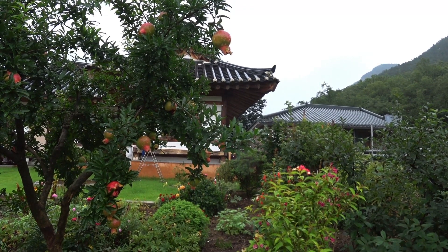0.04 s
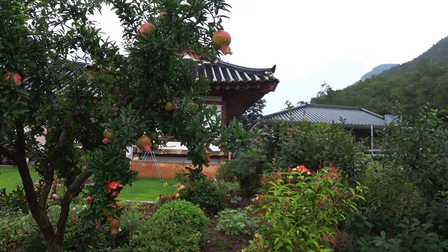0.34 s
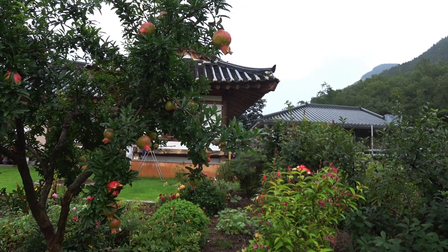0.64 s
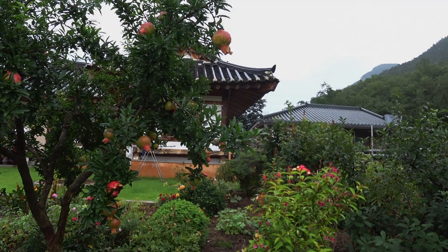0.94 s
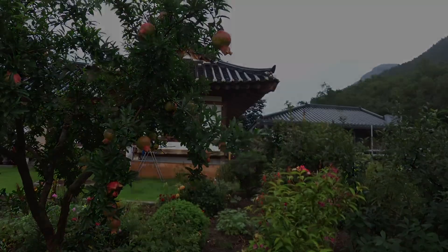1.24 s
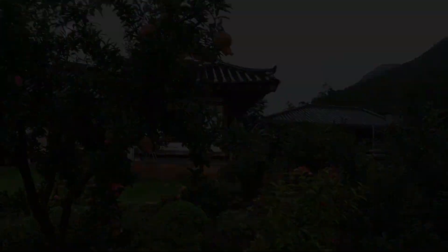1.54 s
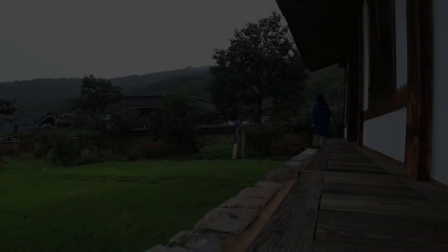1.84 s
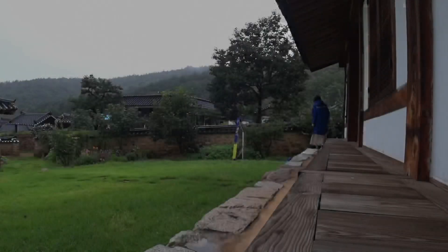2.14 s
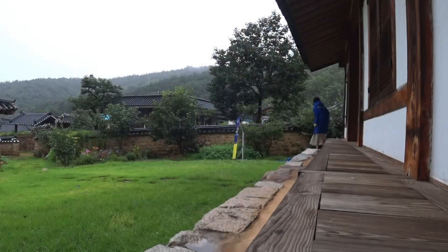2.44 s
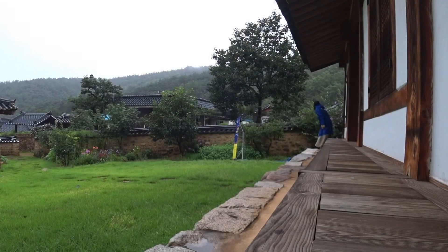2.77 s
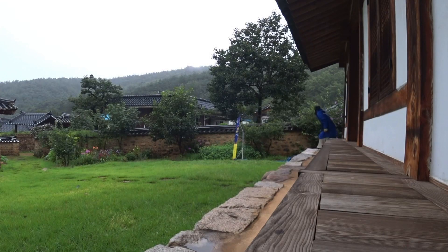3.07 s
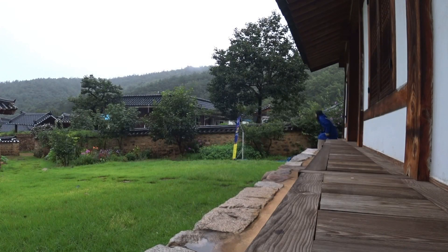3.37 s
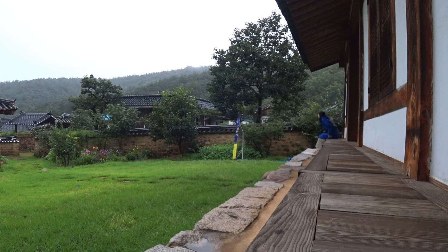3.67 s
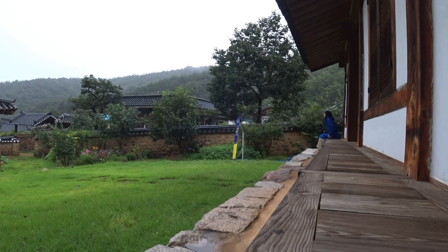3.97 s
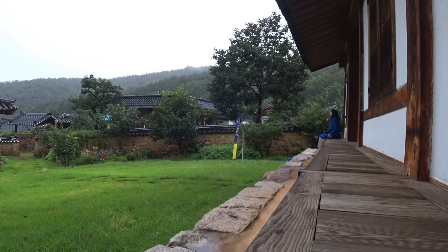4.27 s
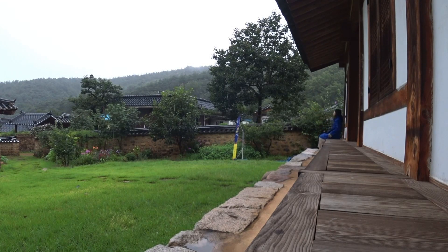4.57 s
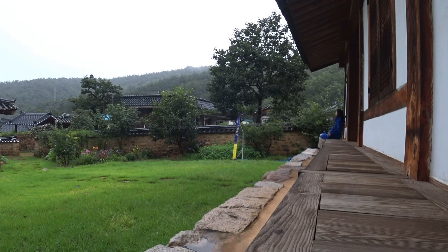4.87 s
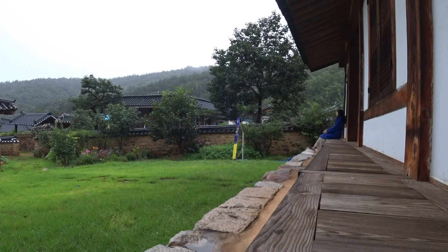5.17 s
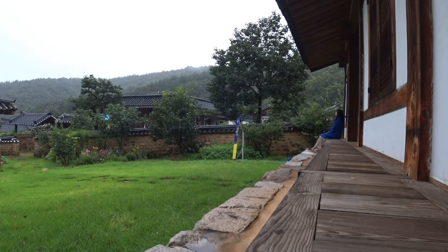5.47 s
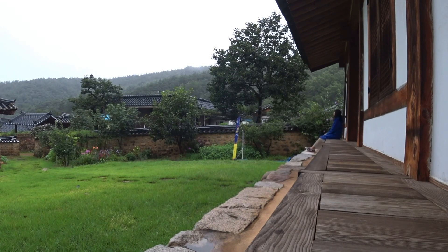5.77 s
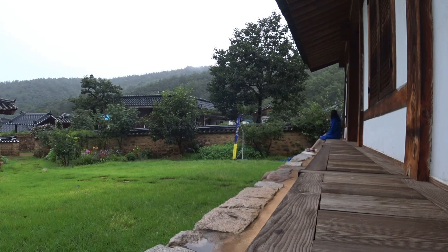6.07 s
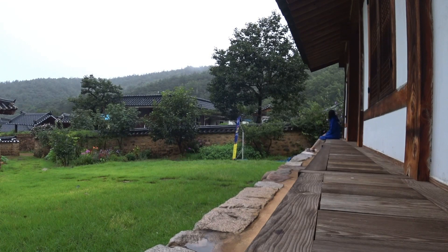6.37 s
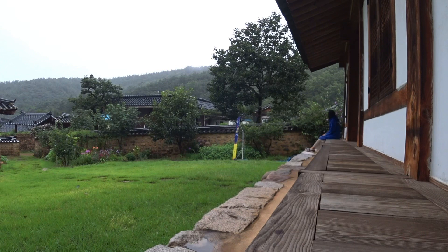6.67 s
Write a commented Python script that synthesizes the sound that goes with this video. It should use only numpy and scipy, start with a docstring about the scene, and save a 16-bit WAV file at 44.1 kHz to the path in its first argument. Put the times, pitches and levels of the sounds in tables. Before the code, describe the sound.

For the first second and a half, steady garden rain is heard from under an umbrella. Drops tap quickly and irregularly on the taut cloth close overhead, and one sharp, bright tick stands out at about 1.4 seconds. Near 1.6 seconds the sound cuts to a split second of silence. Rain then returns, heard from a veranda: a quieter, even hiss on lawn and leaves, slightly grainy with tiny pings, lasting until the end at about 7 seconds. A few small drips tick on the stone edge, most clearly around 3.4 seconds, then more faintly near 4.1, 4.6, 6.1 and 6.7 seconds. A small bird gives thin, very high falling chirps at about 2.6 seconds, twice around 4 seconds and again near 5.9 seconds, with faint, brief held notes near 5.7 and 6.6 seconds.

```python
"""A garden in steady rain, first from under an umbrella: drops tap the taut cloth, one sharp tick close by.
After a short silent break, from a veranda: a quieter, even hiss of countless drops on lawn and leaves,
slightly grainy with faint pings, a few drips ringing on the stone edge,
and a small bird's thin falling chirps and held notes."""
import sys
import numpy as np
from scipy import signal
from scipy.fft import rfft, irfft, next_fast_len
from scipy.io import wavfile

SR = 44100
rng = np.random.default_rng(int(sys.argv[2]) if len(sys.argv) > 2 else 0)


def put_to_file(sound):
    """Save the sound as 16-bit audio at rate SR, in the file named by the first command-line argument."""
    columns = np.atleast_2d(sound).T  # one column per channel
    safe = np.clip(columns, -1, 1)
    whole_steps = np.round(safe * 32767)
    wavfile.write(sys.argv[1], SR, whole_steps.astype(np.int16))


N = 300319

UMBRELLA_END_S, VERANDA_START_S = 1.561, 1.622
CUTOFF_HZ = 11000


def umbrella(flutter_db=-12.0, count=380, patter_db=-40, size_db=1.5, width_db=7):
    """Heavy drops over a random patter, the smaller the commoner; the canopy shivers briefly after each."""
    # Heaviest drops. Each row: start in seconds, peak in dB, left minus right in dB.
    heavy_drops = [(0.0237, -22, 1), (0.0812, -30.5, -1), (0.1132, -31, 0), (0.1347, -27.5, 3),
                   (0.2028, -23.5, -2.5), (0.2445, -22.8, -1.5), (0.3071, -24, 2.5), (0.3928, -24, -1),
                   (0.4353, -29, -.5), (0.4516, -25.5, 0), (0.4602, -21, -1.5), (0.5226, -27, -1.5),
                   (0.5774, -30.5, .5), (0.7224, -29, -1.5), (0.7613, -27.5, -5), (0.8312, -22, -1),
                   (0.8517, -29.5, 0), (0.8749, -29, 0), (0.8809, -22, -.5), (0.8926, -19.4, -1.5),
                   (0.9336, -21, 3), (0.9602, -21.2, -1.5), (0.9636, -27, 0), (1.0196, -29, .5),
                   (1.0355, -26, 2.5), (1.0745, -28, -.5), (1.0893, -21.1, 2), (1.1138, -26.5, 0),
                   (1.1211, -25.7, -.5), (1.1917, -28, -2), (1.2486, -30.5, -.5), (1.2684, -30.5, -.5),
                   (1.2995, -31, -1), (1.3606, -30, 0), (1.3754, -29.5, 0), (1.4849, -24.6, 1)]
    when, size, side = rng.random((count, 3)).T
    peak_db = patter_db + size_db * np.minimum(-np.log(size), 2.1)
    patter = np.column_stack([when * UMBRELLA_END_S, peak_db, width_db * (side - .5)])
    taps = cloth_taps(heavy_drops) + cloth_taps(patter)
    return taps + from_db(flutter_db) * scatter(taps, t60_s=0.061, dull_hz=7000)


def cloth_taps(drops, low_hz=430, soft_hz=970, lag_hz=1360, flatten_s=.000034, detune=.045, uneven_db=1.2):
    """Each drop (s, peak dB, pan dB) flattens on a spot of cloth with its own tension and mix of modes."""
    # Wet cloth modes. Each row: frequency in Hz, level in dB, t60 in seconds.
    cloth_modes = [(510, -2, 0.0054), (839.5, -11, 0.0084), (1074, -3.5, 0.013), (1386, 10, 0.0043),
                   (2200, 3.5, 0.01), (3330, 1, 0.0023)]
    hz, mode_db, t60_s = np.transpose(cloth_modes)
    t = np.arange(SR // 80) / SR
    # thin cloth radiates little bass; a soft drop excites little treble
    colour = np.vstack([signal.butter(2, low_hz, "high", fs=SR, output="sos"),
                        signal.butter(1, soft_hz, fs=SR, output="sos")])
    pole = np.exp(-2 * np.pi * lag_hz / SR)
    out = np.zeros((2, N))
    for (start_s, db, pan_db), spot in zip(drops, rng.standard_normal((len(drops), 3, len(hz)))):
        spot_hz = hz * np.exp(detune * (spot[0] + spot[2, 0]))
        tap = from_db(mode_db + uneven_db * spot[1]) @ ring(t, spot_hz[:, None], t60_s[:, None])
        tap = signal.sosfilt(colour, tap * (1 - np.exp(-t / flatten_s)))
        tap = signal.lfilter([-pole, 1], [1, -pole], tap)  # all-pass: lows trail highs, rounding the tap
        add(out, start_s, from_db(db) * (tap / np.abs(tap).max() + spatter(t)) * pan(pan_db))
    return out


def spatter(t, level_db=-22, t60_s=0.011, band_hz=(3800, 7000)):
    """Short, bright spray of a bursting drop."""
    band = signal.butter(2, band_hz, "band", fs=SR, output="sos")
    return from_db(level_db - 60 * t / t60_s) * rms_one(signal.sosfilt(band, rng.standard_normal(len(t))))


def drips(spray_db=-13, low_db=-1.8, middle_db=-5.5, echo_db=-27, build_hz=1800):
    """A drip flattens on a hard surface, rings three short high modes over a faint knock, throws spray."""
    # Each row: start in seconds, level in dB, lowest and highest mode in Hz, t60 in seconds,
    # right-ear lag in seconds.
    hits = [(0.8728, -41, 6700, 7800, .005, 0), (1.3535, -11, 4750, 7250, .0046, .00004),
            (3.3899, -30, 5700, 7000, .0028, 0), (3.4056, -35.5, 4900, 6700, .009, 0),
            (3.4104, -39, 4900, 6700, .006, 0), (4.0945, -41, 4450, 5430, 0.0043, 0),
            (4.5773, -39, 7460, 10200, .006, 0.0015), (6.0712, -38.5, 3400, 5400, .006, 0),
            (6.1378, -40, 3400, 4900, .006, 0), (6.6931, -38, 4700, 6000, 0.0028, 0.0024)]
    # Dull knock under the tick. Each row: frequency in Hz, level in dB, t60 in seconds.
    knock_modes = [(1050, -16, .009), (1520, -13, 0.007), (2680, -16.5, .007), (3340, -19, 0.0079)]
    t = np.arange(SR // 50) / SR
    colour = signal.butter(2, [2600, 10800], "band", fs=SR, output="sos")
    knock = sum(from_db(db) * ring(t, hz, t60_s) for hz, db, t60_s in knock_modes)
    radius = np.exp(-np.pi * build_hz / SR)
    out = np.zeros((2, N))
    for start_s, db, low_hz, high_hz, t60_s, lag_s in hits:
        spray = spatter(t, spray_db, t60_s, band_hz=(8000, CUTOFF_HZ))
        low = from_db(low_db) * ring(t, low_hz, t60_s)
        middle = from_db(middle_db) * ring(t, np.sqrt(low_hz * high_hz), t60_s)
        tick = low - middle + ring(t, high_hz, t60_s) + spray - knock
        tick = signal.sosfilt(colour, tick * (1 - np.exp(-10 * t / t60_s)))
        # all-pass: the top snaps first, the lowest mode builds up later
        build = [1, -2 * radius * np.cos(2 * np.pi * low_hz / SR), radius * radius]
        tick = signal.lfilter(build[::-1], build, tick)
        tick /= np.sqrt(np.sum(tick ** 2) / (SR / 1000))  # energy of 1 ms at rms 1
        add(out, start_s, from_db(db) * np.array([tick, np.interp(t - lag_s, t, tick)]))
    return out + from_db(echo_db) * scatter(out, t60_s=0.11, dull_hz=5000)


def garden_rain(level_db=-41.0):
    """Rain on the garden around the umbrella."""
    # Each row: frequency in Hz, relative spectral density in dB.
    spectrum = [(30, -32), (70, -25.5), (150, -14.5), (320, -3), (520, 0.6), (680, -2), (800, 2.5),
                (1050, 1), (1400, 0), (1800, -1), (2350, -5), (2900, -5.5), (4700, -8), (7300, -12),
                (9000, -18), (11000, -20.5)]
    # Each row: frequency in Hz, left-right correlation.
    likeness = [(300, 0.96), (1300, 0.86), (1900, 0.47), (4500, 0.74), (7200, 0.64), (9300, 0.092),
                (10700, 0.51)]
    hiss = shower(spectrum, likeness, splashes_per_s=760, splash_db=-4.5, splash_hz=3000, waver_db=0.86)
    return from_db(level_db) * hiss


def lawn_rain(level_db=-43.5):
    """Rain on lawn and leaves, heard from the veranda; the hiss grows slightly louder for a moment."""
    # Each row: frequency in Hz, relative spectral density in dB.
    spectrum = [(30, -39), (90, -19), (120, -20), (175, -14.5), (300, -10), (540, -1.5), (1450, 2),
                (1720, -1), (2450, 0.5), (3400, -1), (4750, -1), (5150, -3.5), (6750, -5), (8800, -12.5),
                (10500, -14)]
    # Each row: frequency in Hz, left-right correlation.
    likeness = [(300, 0.84), (1400, 0.72), (1800, 0.4), (2900, 0.5), (3800, 0.67), (6800, 0.73),
                (9000, 0.037), (10300, 0.58)]
    # Centre in seconds, half length in seconds, rise in dB.
    swell = (6.13, 0.058, 0.86)
    centre_s, half_s, rise_db = swell
    t = np.arange(N) / SR
    hiss = shower(spectrum, likeness, splashes_per_s=900, splash_db=-9.0, splash_hz=2570, waver_db=0.56)
    return from_db(level_db + rise_db * np.exp(-((t - centre_s) / half_s) ** 2)) * hiss


def shower(spectrum, likeness, splashes_per_s, splash_db, splash_hz, waver_db, right_lag_s=.00001):
    """Countless far drops merge into a hiss; nearer ones stand out as fine treble splashes. Rms near 1."""
    size = next_fast_len(N)
    hz = np.fft.rfftfreq(size, 1 / SR)
    far = rfft(rng.standard_normal((2, N)), size)
    lands = rng.random((2, N)) < splashes_per_s / SR
    strength = from_db(4 * np.minimum(rng.exponential(1, (2, N)), 4)) * rng.choice([-1, 1], (2, N))
    highpass = (1j * hz / (splash_hz + 1j * hz)) ** 2
    near = rfft(rms_one(lands * strength), size) * highpass
    mid, side = (far + from_db(splash_db) * near) * from_db(at_hz(spectrum, hz))
    alike = at_hz(likeness, hz)
    stereo = np.sqrt(1 + alike) * mid + np.sqrt(1 - alike) * side * [[1], [-1]]
    stereo[1] *= np.exp(-2j * np.pi * hz * right_lag_s)
    return rms_one(irfft(stereo, size)[:, :N]) * from_db(waver_db * drift(rate_hz=12.0))


def bird(note_hz=6960, echo_db=-10):
    """Falling chirps and thin, husky held notes, blurred by the trees."""
    # Each row: start in seconds, length in seconds, starting pitch in Hz, level in dB.
    chirps = [(2.588, 0.031, 6750, -43.5), (3.875, 0.033, 6850, -42.5), (4.009, 0.026, 6600, -43),
              (5.912, 0.036, 7250, -40)]
    # Each row: start in seconds, length in seconds, level in dB.
    held_notes = [(5.68, 0.078, -53), (6.618, 0.17, -52.5)]
    out = np.zeros((2, N))
    for start_s, length_s, start_hz, db in chirps:
        add(out, start_s, from_db(db) * whistle(length_s, start_hz, fall_hz=1750, quiver_hz=150))
    for start_s, length_s, db in held_notes:
        note = whistle(length_s, note_hz, fall_hz=0, quiver_hz=170, trill_depth=0.013)
        add(out, start_s, from_db(db) * note)
    return out + from_db(echo_db) * scatter(out, t60_s=0.16, dull_hz=8000)


def whistle(length_s, start_hz, fall_hz, quiver_hz, quivers_per_s=700, trill_hz=135, trill_depth=0.014):
    """One note swells and fades, falling ever faster by fall_hz; a trill and a random quiver shake it."""
    t = np.arange(int(length_s * SR)) / SR
    trill = np.sin(2 * np.pi * trill_hz * t)
    quiver = np.interp(t * quivers_per_s, np.arange(256), rng.standard_normal(256))
    glide_hz = start_hz - fall_hz * (t / length_s) ** 1.443
    hz = glide_hz * (1 + trill_depth * trill) + quiver_hz * quiver
    rasp = 1 + 0.26 * trill
    return np.sqrt(np.sin(np.pi * t / length_s)) * rasp * np.sin(2 * np.pi * np.cumsum(hz) / SR)


def pings(level_db=-53, size_db=4.5, rise_s=0.00046, t60_s=0.0084, low_hz=1000, high_hz=7500, count=900):
    """Faint, brief random pings that give the hiss a slightly grainy texture."""
    t = np.arange(SR // 25) / SR
    out = np.zeros((2, N))
    for when, pitch, size, side in rng.random((count, 4)):
        db = level_db + size_db * min(-np.log(size), 3)
        ping = ring(t, low_hz + (high_hz - low_hz) * pitch, t60_s) * (1 - np.exp(-t / rise_s))
        add(out, when * N / SR, from_db(db) * ping * pan(10 * (side - .5)))
    return out


def scatter(x, t60_s, dull_hz, gap_s=.002):
    """Diffuse reflections from things nearby, different in each ear; unit gain."""
    t = np.arange(SR // 4) / SR
    tail = rng.standard_normal((2, len(t))) * from_db(-60 * t / t60_s) * (t > gap_s)
    tail = signal.sosfilt(signal.butter(1, dull_hz, fs=SR, output="sos"), tail)
    tail /= np.sqrt(np.sum(tail ** 2, axis=1, keepdims=True))
    return signal.fftconvolve(x, tail, axes=1)[:, :N]


def ring(t, hz, t60_s):
    """Struck mode, peak 1."""
    return np.cos(2 * np.pi * hz * t) * from_db(-60 * t / t60_s)


def drift(rate_hz):
    """Slow random wander, rms 1."""
    hz = np.fft.rfftfreq(N // 64, 64 / SR)
    slow = irfft(rfft(rng.standard_normal(N // 64)) / (1 + (hz / rate_hz) ** 2))
    return np.interp(np.arange(N) / 64, np.arange(len(slow)), rms_one(slow))


def from_db(db):
    return 10 ** (np.asarray(db) / 20)


def rms_one(x):
    return x / np.sqrt(np.mean(x ** 2) + 1e-20)


def at_hz(points, hz):
    """Interpolate (Hz, value) rows on a log-frequency axis."""
    knots_hz, values = np.transpose(points)
    return np.interp(np.log(hz + 1), np.log(knots_hz), values)


def pan(db):
    """Stereo gains for left minus right in dB."""
    return from_db(np.array([[db], [-db]]) / 2)


def add(out, start_s, sound):
    i = int(np.clip(start_s * SR, 0, N - 1))
    out[..., i:i + sound.shape[-1]] += sound[..., :N - i]


def scene():
    """Under the umbrella, a short silence, then on the veranda."""
    t = np.arange(N) / SR
    garden, lawn = garden_rain(), lawn_rain()
    under_umbrella = (garden + umbrella()) * pan(-.5)
    on_veranda = (lawn + pings()) * pan(1.14) + bird()
    tail = from_db(-24 - 950 * np.maximum(t - UMBRELLA_END_S, 0))  # faint, dying at 950 dB/s
    fade_out = np.clip((UMBRELLA_END_S - t) / 0.0011, tail, 1)
    fade_in = np.clip((t - VERANDA_START_S) / 0.0016, 0, 1)
    return fade_out * under_umbrella + fade_in * on_veranda + drips()


def record(dry):
    """Steep low-pass."""
    return signal.sosfilt(signal.ellip(12, .1, 70, CUTOFF_HZ, fs=SR, output="sos"), dry)


dry = scene()
out = record(dry)
put_to_file(out)
```